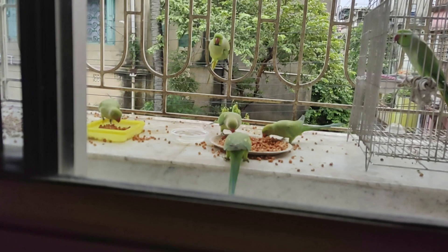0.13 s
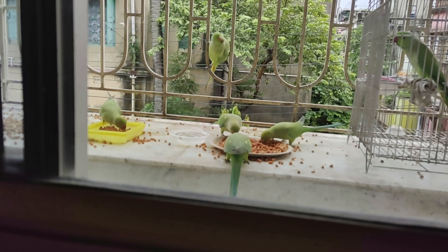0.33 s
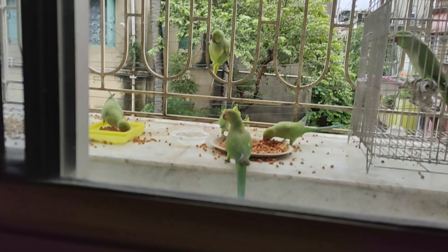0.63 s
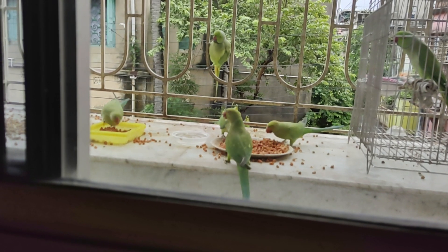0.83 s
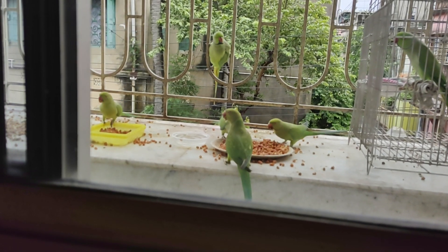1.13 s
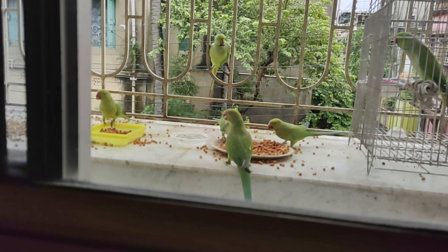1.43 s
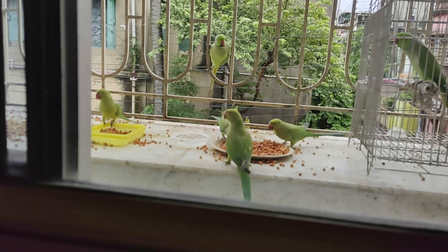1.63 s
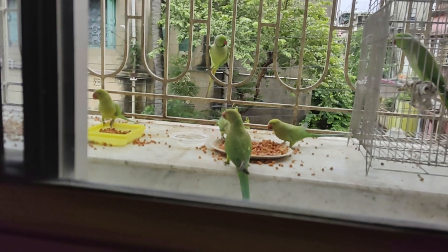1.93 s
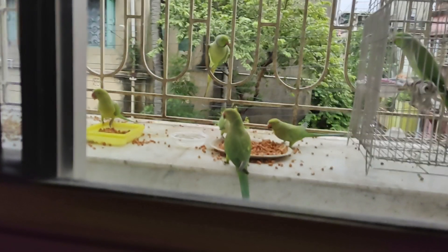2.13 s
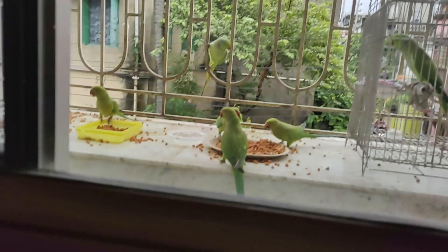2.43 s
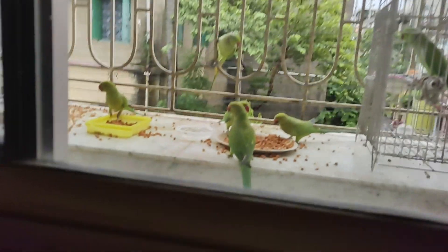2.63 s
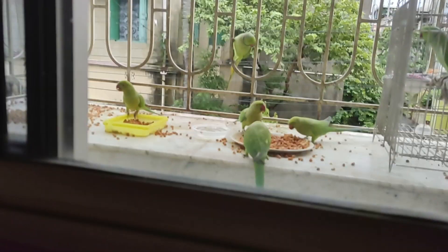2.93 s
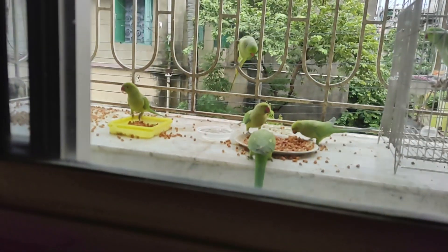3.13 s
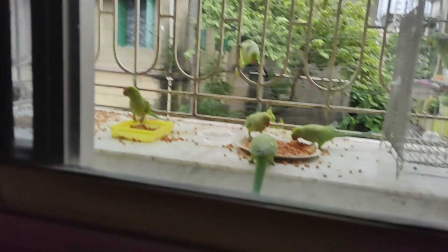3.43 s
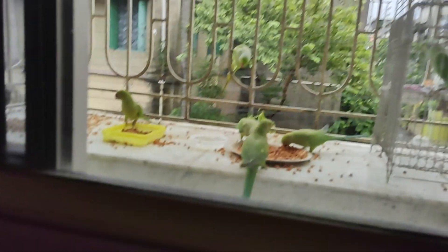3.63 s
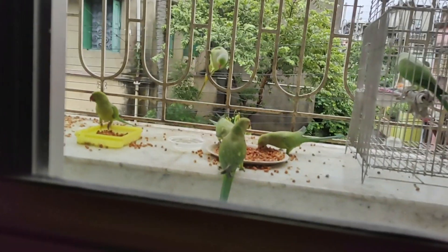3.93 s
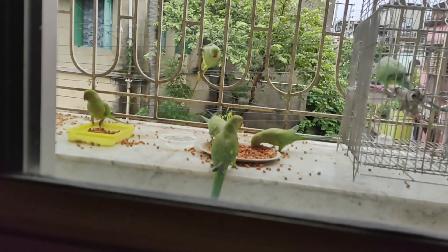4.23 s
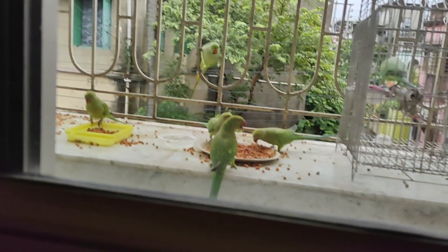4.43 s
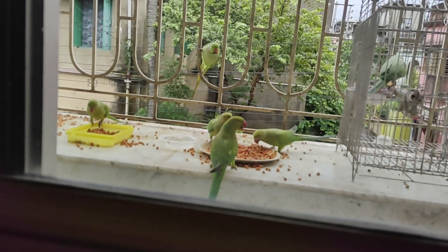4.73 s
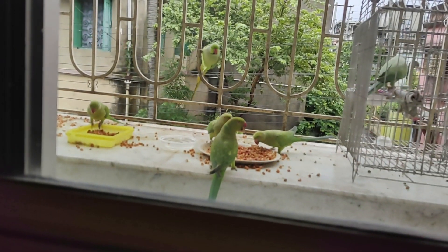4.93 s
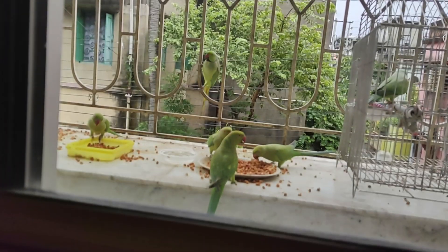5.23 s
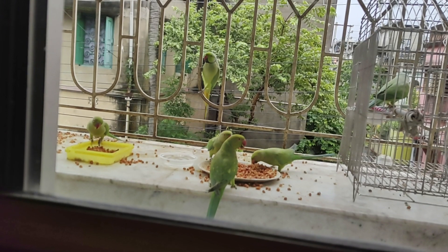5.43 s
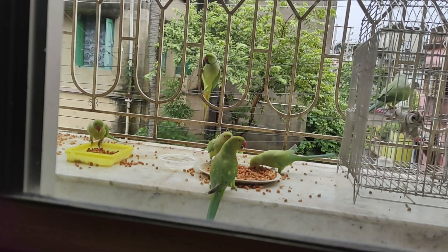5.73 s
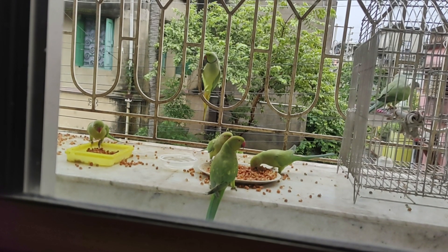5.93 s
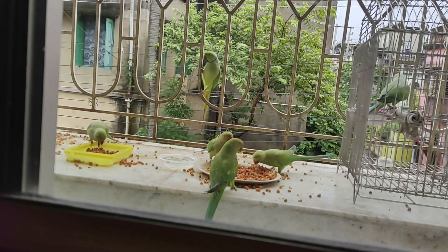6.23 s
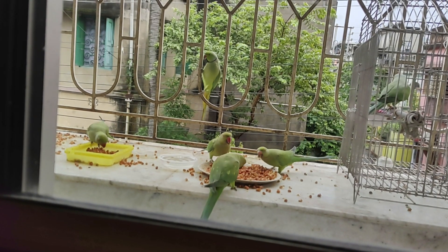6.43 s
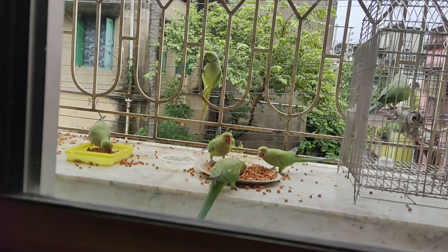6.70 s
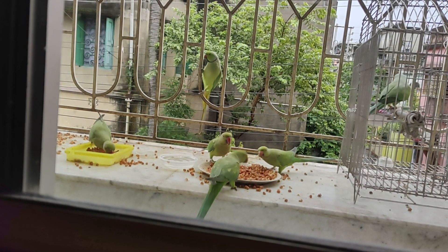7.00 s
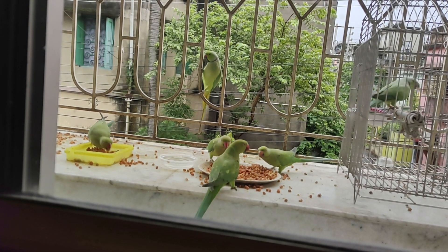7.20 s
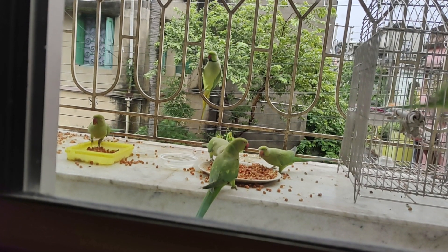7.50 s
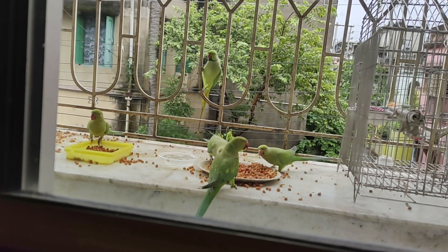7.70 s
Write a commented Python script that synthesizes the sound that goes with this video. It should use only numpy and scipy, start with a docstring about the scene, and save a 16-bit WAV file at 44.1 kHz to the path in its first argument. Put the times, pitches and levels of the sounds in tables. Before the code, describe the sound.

Parakeets give harsh falling screeches in two runs by a window, over low town rumble, droning motorbikes and close taps on the phone.

```python
"""Out of a silent start come a hand's creak and tick on the phone, then the first run of parakeet screeches.
Meanwhile one motorbike drones away and another hums far off; ticks and rubs of the hand follow.
Later a third motorbike arrives under a second run of screeches. Town noise and a faint whine last throughout.
Birds are buzzing overtones smeared by yard walls, bikes are stacks of sine waves, town and rubs are shaped
noise, and knocks ring the phone's case. The hand is next to the right microphone."""
import sys
import numpy as np
from scipy import signal
from scipy.fft import rfft, irfft, next_fast_len
from scipy.io import wavfile
from scipy.ndimage import uniform_filter1d, map_coordinates

SR = 44100
rng = np.random.default_rng(int(sys.argv[2]) if len(sys.argv) > 2 else 0)


def generate_wav(signal):
    """Clip the signal to [-1, 1] and save it as 16-bit WAV at the path in sys.argv[1]."""
    frames = np.transpose(np.atleast_2d(signal))
    scaled = np.clip(frames, -1, 1) * 32767
    pcm = np.round(scaled).astype(np.int16)
    wavfile.write(sys.argv[1], SR, pcm)


N = 346626

# Town loudness over time: start_s, wash_db, rumble_db, wash_treble_lift_db
TOWN_LEVELS = [(0.62, -44.5, -44, 2), (1.08, -48, -49, -0.5), (1.89, -48.5, -46, -2),
               (2.74, -58, -53, -2.5), (3.08, -56, -53.5, -3), (4.01, -62, -59.5, -2),
               (4.6, -63.5, -57.5, 0.5), (4.98, -63.5, -59, -1), (5.2, -59, -57.5, -3),
               (5.58, -54, -46.5, -0.5), (5.98, -53, -52, -1.5), (6.15, -51, -52, 3.5),
               (6.63, -52.5, -45.5, -1), (7.07, -53.5, -50, 4.5), (7.86, -53, -46, 1)]
# Tone colour of the two town noises: pitch_hz, density_db (per Hz, relative)
WASH_COLOUR = [(180, -27), (300, -7), (555, -12), (713, -10), (774, -15), (828, -3.5), (930, -5.5),
               (1080, -11.5), (1660, -14), (2360, -15.5), (2790, -16), (3080, -26), (6200, -34.5),
               (16000, -52.5)]
RUMBLE_COLOUR = [(15, -42.5), (25, -33), (54, -10), (102, -3.5), (138, 1), (167, -5), (316, -11.5),
                 (420, -40.5), (550, -51), (920, -120)]
# How alike left and right are in the town noise: pitch_hz, likeness (-1 to 1)
LEFT_RIGHT_LIKENESS = [(40, 0.9), (180, 0.87), (550, 0.6), (1650, -0.19), (4970, 0.23), (15000, -0.35)]
# Thin steady tones: pitch_hz, level_db (rms, before they waver)
WHINE_TONES = [(699.8, -76.5), (850.6, -81), (899.0, -71.5), (952.8, -78)]
WASH_TREBLE_HZ = 1310

# Motorbikes over time: start_s, firing_hz, level_db (before colouring),
# favoured_hz (what the street's echoes favour), favoured_lift_db
LEAVING_BIKE = [(.62, 30.5, -74, 143, 5), (.9, 30.72, -64, 135, -4), (1.15, 28.4, -66, 120, 16),
                (1.45, 27.67, -70, 138, 19), (1.8, 27.83, -63.5, 114.2, 11.5),
                (2.05, 27.55, -64.5, 105.4, 25.5), (2.4, 26.37, -66.5, 131, 15),
                (2.75, 27.1, -68.5, 109.5, 21), (3.05, 25.56, -71, 121, 26), (3.3, 24.49, -69, 98, 23.5),
                (3.6, 23.08, -67, 90.95, 6), (4.3, 20.28, -73, 79.8, 12.5)]
ARRIVING_BIKE = [(5.1, 24.82, -76, 107.4, 7.8), (5.21, 23.86, -63.5, 129, 5.7),
                 (5.38, 26.84, -61, 135, 20.6), (5.77, 30.15, -60, 177, 9.4), (5.91, 31.51, -57, 129, 5),
                 (6.06, 31.58, -49, 127, 15.1), (6.2, 32.85, -57, 135.5, 25), (6.48, 34.44, -55, 137, 20.4),
                 (6.67, 35.47, -55, 169, 12), (6.77, 34.86, -52.5, 141, 11.7), (6.87, 32.4, -52, 130, 18),
                 (6.98, 31.17, -47, 131, 8.7), (7.21, 32.21, -53, 163.6, 16), (7.37, 31.57, -50, 130, 4.6),
                 (7.55, 31.65, -55.5, 126, 18), (7.68, 30.86, -51, 119, 13), (7.76, 30.1, -58, 111, 13),
                 (7.86, 28.05, -52, 100, 21)]
DISTANT_BIKE = [(.6, 29.4, -88, 280, 5), (.9, 30.26, -56, 310, 16), (1.25, 31, -46.5, 306, 12),
                (1.7, 31.55, -47, 284, 6.5), (2.0, 31.78, -44.5, 320, 6.1), (2.3, 32.3, -46, 313, 3.4),
                (2.45, 33, -82.5, 319.3, 1.8)]
# Exhaust tone colour: pitch_hz, gain_db
EXHAUST_COLOUR = [(45, -4), (65, -1.5), (90, -3), (130, 0), (170, -1), (200, -0.5), (250, -13), (400, -22)]
FAVOURED_WIDTH_HZ = 19

# Finger slips: start_s, snap_db (peak), knock_db (before the case rings)
FINGER_TICKS = [(0.533, -42, 20), (1.753, -40.5, 5.5), (1.7645, -32.5, 17), (1.7681, -20.5, 25.5),
                (1.7745, -23.5, 11), (1.8064, -39, 6), (1.8118, -37.5, -1), (1.8207, -34.5, -8.5),
                (1.8288, -43.5, -6), (1.8339, -46, -3.5), (1.838, -33, -33)]
# Resonances of the phone's case: pitch_hz, width_hz, gain_db
CASE_RESONANCES = [(232, 120, -1.5), (732, 330, 0), (1620, 1400, -9), (2890, 600, -7.5)]
# Creaks: start_s, held_s, level_db, fall_db_per_s
CASE_CREAKS = [(0.504, 0.048, -23, 2800), (1.756, 0.0012, -24, 333.5)]
CREAK_RISE_DB_PER_S, CREAK_ARCH_DB = 4000, 6.5
# Skin sliding on the case: start_s, length_s, fine_hiss_db, coarse_scratch_db
RUB_STROKES = [(1.769, 0.038, -62, -36), (1.823, 0.038, -46.5, -36.5), (2.025, 0.066, -67.5, -44),
               (2.254, .045, -70.5, -60.5), (2.302, .088, -61.5, -42.5), (2.556, 0.15, -63, -50.5),
               (2.764, 0.066, -73, -57.5), (2.969, 0.063, -78.5, -56), (3.08, .05, -81.5, -62),
               (3.452, .09, -71.5, -57.5), (3.804, 0.064, -71, -58.5), (3.913, 0.0873, -69.5, -58),
               (4.252, 0.043, -71, -64), (4.495, 0.11, -70, -69.5), (4.696, .05, -73.5, -67),
               (5.032, 0.18, -71.5, -60)]
# Tone colour of rubbing skin: pitch_hz, density_db (per Hz, relative)
SKIN_COLOUR = [(180, -15), (300, -3.5), (701, -13.5), (749, -10.5), (828, -15), (1280, -16.5),
               (2980, -16.5), (4370, -26.5), (16000, -45)]
# Rise before a stroke, fall after it, swell within it
PRESS_DB_PER_S, LIFT_DB_PER_S, ARCH_DB = 600, 500, 3

# Falling screeches: start_s, held_s, fall_s, peak_at (share of the fall where effort peaks), held_pitch_hz,
# peak_pitch_hz, last_pitch_hz, held_level_db, peak_level_db, roughness (0-1)
FALLING_SCREECHES = [(0.586, .03, 0.1, 0.35, 2250, 2038, 1850, -49, -38, 0.2),
                     (.755, .025, .105, .5, 2418, 2103, 1610, -25, -22, .26),
                     (.975, .052, .1, .6, 2439, 1983, 1700, -25.5, -22.5, .18),
                     (1.475, .04, .1, 0.35, 2558, 2320, 2000, -54, -53.5, .2),
                     (5.35, .095, .09, .4, 2584, 2359, 1816, -28.5, -27, 0.5),
                     (5.603, .05, .105, .4, 2683, 2085, 1688, -25.5, -23, .18),
                     (5.858, .06, .1, .45, 2557, 1864, 1617, -21, -20.5, 0.4),
                     (6.48, 0.033, .12, .4, 2508, 2114, 1635, -29, -23.5, .25),
                     (6.735, .048, .105, .55, 2444, 1805, 1632, -27, -23, .3),
                     (7.755, 0.036, 0.092, 0.24, 2350, 2105, 1623, -32.5, -28.5, 0.3)]
# Level notes, mostly from the other side of the voice organ as a run opens:
# start_s, length_s, pitch_hz, level_db, roughness (0-1), slack_db (weakens overtones)
STEADY_NOTES = [(.55, .06, 2443, -39, 0.04, 14.5), (0.712, .07, 3360, -23.5, .25, 4),
                (5.175, 0.066, 4390, -68.5, 0.1, 0), (6.456, .08, 3379, -31, 0.3, 1),
                (7.702, .11, 3250, -27, .18, 9.5)]
# Low catches before a screech: start_s, level_db
LOW_CATCHES = [(.703, -28.5), (5.591, -43), (6.445, -31)]
# Tone colour of the throat: pitch_hz, gain_db
THROAT_COLOUR = [(1000, -8), (1500, -22.5), (2400, -4), (3000, 2.5), (3700, 6.5), (4800, 0.5), (6200, -6),
                 (7500, -13.5), (10000, -8), (12000, -20.5), (16000, -32)]
# Echo of the yard: pitch_hz, decay_s (time to fade by 60 dB)
YARD_DECAY = [(1000, .3), (2100, .42), (3500, .4), (5000, .33), (7000, .29), (11000, .26), (16000, .2)]
# Share of period doubling: held, at the effort peak, at the end (0-1)
FALL_DOUBLING = .25, .12, .3

# Start and release of bird notes
RISE_S, RISE_DB, RELEASE_S, RELEASE_DB = 0.016, 15, 0.027, 23.5
SCOOP = .14  # share of the pitch that a screech or level note starts under
SWELL_DB_PER_S, FADE_DB = 148.5, 7  # swell while held; loss at the end of the fall
SMOOTH_PEAK, ROUGH_END = 0.13, 0.14  # roughness lost at the peak and gained at the end
SAG, LEVEL_SWELL_DB, LEVEL_DOUBLING = 0.033, 4, 0.16  # sag: share of pitch lost over a level note
GRUNT_HZ, GRUNT_S, GRUNT_ROUGH, GRUNT_SLACK_DB = 1010, .01, .05, 20
LEAP_HZ, LEAP_S = 2480, 0.015  # the catch breaks upward as it ends

# Tone colour of microphone hiss: pitch_hz, density_db (per Hz, relative)
HISS_COLOUR = [(1500, -35.5), (4000, -1.5), (8000, 1), (16000, -4.5)]
START_S, TOP_HZ = 0.3993, 15820


def amp(db):
    """Turn decibels into a plain multiplier."""
    return 10 ** (np.asarray(db) / 20)


def unit(x):
    """Scale a sound to an average (rms) strength of 1."""
    return x / np.sqrt(np.mean(x ** 2) + 1e-20)


def along(points, hz):
    """Read a value between (pitch, value) points, with pitch on a log scale."""
    f, v = np.transpose(points)
    return np.interp(np.log(hz + 1), np.log(f + 1), v)


def curves(rows, t=None):
    """Join each column after the time into a curve with one value per sample."""
    s, *columns = np.transpose(rows)
    t = np.arange(N) / SR if t is None else t
    return [np.interp(t, s, column) for column in columns]


def wobble(rate, count=N):
    """Draw a smooth random curve through `rate` random values a second."""
    knots = rng.standard_normal(int(count * rate / SR) + 4)
    return map_coordinates(knots, [np.arange(count) * rate / SR])


def filtered(x, response):
    """Change the strength and timing of each frequency by a complex response."""
    m = next_fast_len(N + SR // 2)
    return irfft(rfft(x, m) * response(np.fft.rfftfreq(m, 1 / SR)), m)[..., :N]


def rush(spectrum, patchy_db):
    """Make stereo noise whose strength varies in random patches of time and pitch."""
    z = signal.stft(rng.standard_normal((2, N)), nperseg=512)[2]
    patches = rng.standard_normal(z.shape[1:])
    patches = uniform_filter1d(uniform_filter1d(patches, 6, 0), 14, 1)
    pair = signal.istft(z * amp(patchy_db * unit(patches)), nperseg=512)[1][:, :N]

    def middle_and_side(hz):
        # the angle sets how alike left and right become
        turn = np.arccos(np.clip(along(LEFT_RIGHT_LIKENESS, hz), -1, 1)) / 2
        return amp(along(spectrum, hz)) * [np.cos(turn), np.sin(turn)]

    mid, side = filtered(pair, middle_and_side)
    return unit(np.array([mid + side, mid - side]))


def whine():
    """A few thin tones that waver slightly in strength and phase."""
    t = np.arange(N) / SR
    out = np.zeros(N)
    for hz, db in WHINE_TONES:
        gain = np.sqrt(2) * amp(db + 2.3 * wobble(5.6))
        out += gain * np.sin(2 * np.pi * hz * t + .9 * wobble(2.8))
    return out


def town():
    """Far traffic blends into a wash and a low rumble, with the whine on top."""
    wash_db, rumble_db, treble_db = curves(TOWN_LEVELS)
    wash = rush(WASH_COLOUR, patchy_db=1.0)
    treble = filtered(wash, lambda hz: hz ** 4 / (hz ** 4 + WASH_TREBLE_HZ ** 4))
    wash = wash + (amp(treble_db) - 1) * treble
    wash = amp(wash_db + .7 * wobble(6)) * wash
    rumble = amp(rumble_db + 1.2 * wobble(8)) * rush(RUMBLE_COLOUR, patchy_db=2)
    return (wash + rumble) * amp([[-.9], [.9]]) + whine()


def motorbike(rows, order, count):
    """A single cylinder sounds unsteady multiples of its firing rate; the street lifts those near one pitch."""
    hz, db, favoured_hz, lift_db = curves(rows)
    phase = 2 * np.pi * np.cumsum(hz) / SR
    first_s, last_s = rows[0][0], rows[-1][0]
    heard = np.interp(np.arange(N) / SR, [first_s - .2, first_s, last_s, last_s + 0.12], [0, 1, 1, 0])
    tone = np.zeros(N)
    for k in range(order, order + count):
        street_db = lift_db * np.exp(-((k * hz - favoured_hz) / FAVOURED_WIDTH_HZ) ** 2)
        gain = amp(db + along(EXHAUST_COLOUR, k * hz) + street_db + 3 * wobble(3.8))
        tone += gain * np.sin(k * phase + 0.55 * wobble(10))
    return np.sqrt(2) * heard * tone * amp([[-.6], [.6]])


def motorbikes():
    """One bike leaves, one arrives, and one far off is heard only by multiples 9 and 10."""
    leaving = motorbike(LEAVING_BIKE, order=2, count=7)
    arriving = motorbike(ARRIVING_BIKE, order=2, count=10)
    distant = motorbike(DISTANT_BIKE, order=9, count=2)
    return leaving + arriving + distant


def case(f):
    """The phone's case rings at a few resonances, with every other one flipped in sign."""
    total = 0
    for k, (centre, width, db) in enumerate(CASE_RESONANCES):
        ring = 1j * f * width / (centre * centre - f * f + 1j * f * width)
        total = total + (-1) ** k * amp(db) * ring
    return total


def pressure(s, length, rise_db_per_s, fall_db_per_s, arch_db):
    """The strength of one touch rises, holds with a swell and falls."""
    t = np.arange(N) / SR - s
    arch = (2 * np.clip(t / length, 0, 1) - 1) ** 2
    rise_db = rise_db_per_s * np.minimum(t, 0)
    fall_db = fall_db_per_s * np.maximum(t - length, 0)
    return amp(rise_db - fall_db - arch_db * arch)


def ticks():
    """Each finger slip gives a quick downward snap, then a knock that rings the case."""
    blows, snaps, t = np.zeros(N), np.zeros(N), np.arange(SR // 100) / SR
    snap_hz = 3500 + 10000 * np.exp(-t / .001)
    snap = np.sin(2 * np.pi * np.cumsum(snap_hz) / SR)
    for s, snap_db, knock_db in FINGER_TICKS:
        start = round(s * SR)
        blows[start + SR // 1000] = amp(knock_db)  # the knock follows the snap by 1 ms
        snaps[start:][:len(t)] += amp(snap_db - 60 * t / 0.013) * snap
    return filtered(blows, case) + snaps


def creaks():
    """Uneven grains of noise under pressure sound through the case, with their treble softened."""
    grains = amp(2.5 * wobble(250)) * rng.standard_normal(N)
    grains = unit(filtered(grains, lambda f: case(f) / (1 + (f / 900) ** 2)))
    gain = np.zeros(N)
    for s, held, db, fall in CASE_CREAKS:
        gain += amp(db) * pressure(s, held, CREAK_RISE_DB_PER_S, fall, CREAK_ARCH_DB)
    return gain * grains


def rubs():
    """Skin sliding on the case makes uneven noise: a fine hiss and a coarser scratch."""
    skin = amp(2.5 * wobble(500)) * rng.standard_normal((2, N))
    fine = unit(filtered(skin, lambda f: amp(along(SKIN_COLOUR, f)) / (1 + (5000 / (f + 1)) ** 4)))
    coarse = unit(filtered(skin, lambda f: amp(along(SKIN_COLOUR, f)) / (1 + (f / 5000) ** 4)))
    fine_gain, coarse_gain = np.zeros(N), np.zeros(N)
    for s, length, fine_db, coarse_db in RUB_STROKES:
        touch = pressure(s, length, PRESS_DB_PER_S, LIFT_DB_PER_S, ARCH_DB)
        fine_gain += amp(fine_db) * touch
        coarse_gain += amp(coarse_db) * touch
    return fine_gain * fine + coarse_gain * coarse


def hand():
    """Touches on the case are strong at the right microphone and much weaker at the left."""
    return (ticks() + creaks()) * amp([[-22], [0]]) + rubs() * amp([[-12], [0]])


def yard(x, direct_db):
    """The direct sound, then the walls' answer, where each frequency dies at its own speed."""
    hz, t, z = signal.stft(rng.standard_normal((2, SR)), SR, nperseg=256)
    fading = amp(-60 * t / along(YARD_DECAY, hz)[:, None])
    tail = signal.istft(z * fading, SR, nperseg=256)[1]
    tail = tail / np.linalg.norm(tail[0])
    tail[0, 12] += amp(direct_db)  # the left microphone is a little farther from the birds
    tail[1, 0] += amp(direct_db)
    return signal.fftconvolve(x[None], tail, axes=1)


def falling(s, held, fall, peak_at, hz, peak_hz, last_hz, held_db, db, rough):
    """Rise, swell on a held pitch, slide down with most effort partway, then release."""
    turn = s + max(held, RISE_S + 1 / SR)
    peak_s = turn + np.clip(peak_at, 0, 1) * fall
    end = turn + fall
    risen_db = held_db - SWELL_DB_PER_S * (turn - s - RISE_S)
    end_db, end_rough = db - FADE_DB, rough + ROUGH_END
    held_doubling, peak_doubling, end_doubling = FALL_DOUBLING
    # start_s, pitch_hz, level_db, roughness, doubling
    return [(s, hz * (1 - SCOOP), risen_db - RISE_DB, rough, held_doubling),
            (s + RISE_S, hz, risen_db, rough, held_doubling),
            (turn, hz, held_db, rough, held_doubling),
            (peak_s, peak_hz, db, rough - SMOOTH_PEAK, peak_doubling),
            (end, last_hz, end_db, end_rough, end_doubling),
            (end + RELEASE_S, last_hz, end_db - RELEASE_DB, end_rough, end_doubling)]


def level(s, length, hz, db, rough):
    """Rise, swell with a slight sag in pitch, then release."""
    end, mid = s + RISE_S + length, s + RISE_S + length / 2
    points = [(s, hz * (1 - SCOOP), db - LEVEL_SWELL_DB - RISE_DB),
              (s + RISE_S, hz, db - LEVEL_SWELL_DB),
              (mid, hz, db),
              (end, hz * (1 - SAG), db),
              (end + RELEASE_S, hz * (1 - SAG), db - RELEASE_DB)]
    return [(*point, rough, LEVEL_DOUBLING) for point in points]


def grunt(s, db):
    """Rise on a low pitch, hold briefly, then break upward."""
    end = s + RISE_S + GRUNT_S
    points = [(s, GRUNT_HZ, db - RISE_DB), (s + RISE_S, GRUNT_HZ, db),
              (end, GRUNT_HZ, db), (end + LEAP_S, LEAP_HZ, db)]
    return [(*point, GRUNT_ROUGH, 0) for point in points]


def screech(rows, slack_db):
    """A membrane buzzes; its overtones pass the throat; rough effort shakes its period and strength."""
    t = rows[0][0] + np.arange(SR // 4) / SR
    hz, db, rough, doubling = curves(rows, t)
    rough, doubling = np.clip(rough, 0, 1), np.clip(doubling, 0, 1)

    def shake(rate):
        return wobble(rate, count=len(t))

    hz = hz * (1 + (.22 + rough) * (.05 * shake(900) + .02 * shake(120)))
    phase = 2 * np.pi * np.cumsum(hz) / SR
    k = np.arange(2, 21)[:, None] / 2  # multiples of the pitch: 1, 1.5, 2 ... 10
    # strong and weak cycles alternate, which adds tones halfway between the overtones
    share = np.where(k % 1 > 0, doubling, 1)
    share = share * amp(4 * np.array([shake(92.5) for _ in k]))  # overtones break up one by one
    effort_db = np.maximum(db - db.max() - slack_db, -20)
    share = share * amp(.5 * effort_db * np.log2(k))  # more effort, stronger overtones
    share = share * amp(along(THROAT_COLOUR, k * hz)) * (k * hz < SR / 2)
    tone = unit(np.sum(share * np.sin(k * phase), axis=0))
    # a slower, uneven flap chops the tone into bursts
    flap = np.sin(2 * np.pi * np.cumsum(170 + 60 * shake(40)) / SR)
    rasp = unit(amp((3 + 7 * rough) * flap + 1.5 * shake(90)))
    f = np.fft.rfftfreq(len(t), 1 / SR)
    breath = rfft(rng.standard_normal(len(t))) * amp(along(THROAT_COLOUR, f)) * (f > 1600)
    hiss = unit(irfft(breath, len(t)))
    voice = rasp * tone + (.22 + .9 * rough) * np.sqrt(rasp) * hiss
    call = (t < rows[-1][0]) * amp(db) * voice
    # fainter birds sit farther off, behind leaves, so their treble is duller
    dull_db = .7 * min(db.max() + 30, 0) * np.log2(1 + (f / 7000) ** 2)
    return irfft(rfft(call) * amp(dull_db), len(t))


def parakeets():
    """Falling screeches, level notes and low catches all echo in the yard."""
    notes = [(falling(*row), 0) for row in FALLING_SCREECHES]
    notes += [(level(*row), slack_db) for *row, slack_db in STEADY_NOTES]
    notes += [(grunt(*row), GRUNT_SLACK_DB) for row in LOW_CATCHES]
    out = np.zeros((2, N + 2 * SR))
    for rows, slack_db in notes:
        wet = yard(screech(rows, slack_db), direct_db=-6)
        start = round(rows[0][0] * SR)
        out[:, start:][:, :wet.shape[1]] += wet
    return out[:, :N]


def scene():
    """Add the layers, from the background to the birds."""
    return town() + motorbikes() + hand() + parakeets()


def record(dry):
    """The phone starts after a silent moment, comes up to level, hisses and drops all above its band limit."""
    t = np.arange(N) / SR
    switch_on = np.clip((t - START_S) / 0.0022, 0, 1)
    on = switch_on * amp(np.interp(t, [START_S, .56], [-11, 0]))
    noise = rng.standard_normal((2, N))
    hiss = amp(-78.5) * unit(filtered(noise, lambda hz: amp(along(HISS_COLOUR, hz))))
    return on * filtered(dry + hiss, lambda hz: hz < TOP_HZ)


dry = scene()
out = record(dry)
generate_wav(out)
```